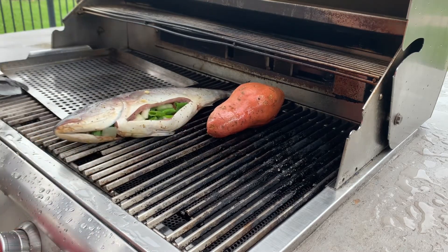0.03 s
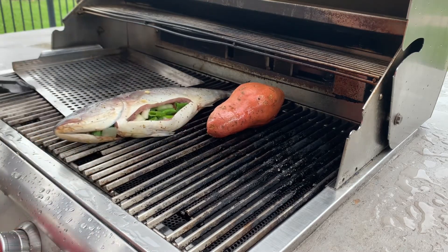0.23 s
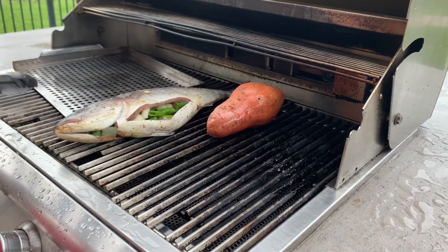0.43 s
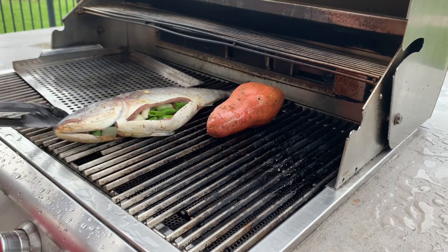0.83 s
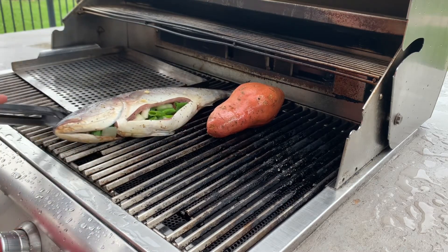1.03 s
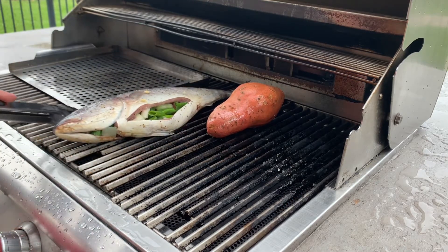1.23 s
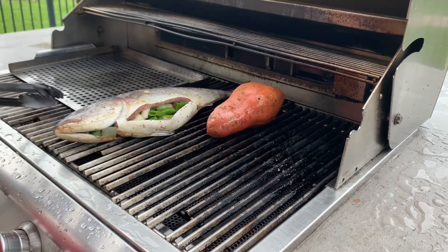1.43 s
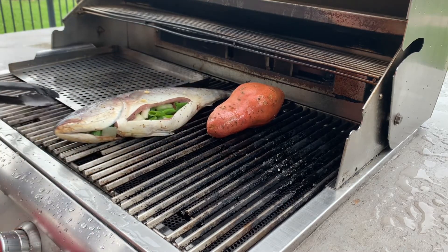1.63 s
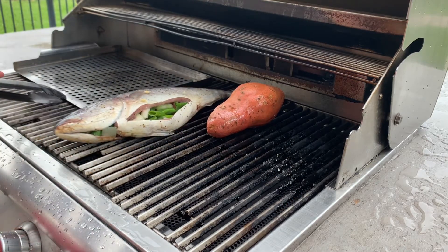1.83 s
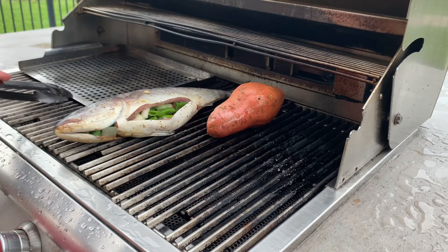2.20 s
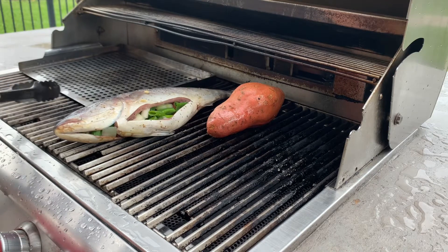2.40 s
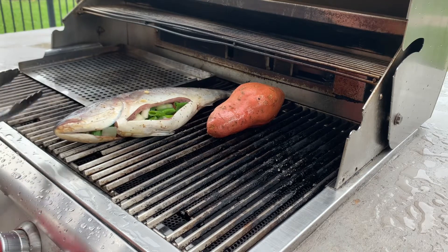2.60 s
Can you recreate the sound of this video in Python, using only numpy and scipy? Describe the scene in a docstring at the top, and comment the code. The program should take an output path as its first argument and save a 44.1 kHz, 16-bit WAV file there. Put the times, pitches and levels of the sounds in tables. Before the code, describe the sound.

Close by, metal tongs clank sharply on a grill tray, knock twice more, then finish with a longer ringing scrape. Fat sizzles faintly and a soft hiss comes and goes over a steady outdoor rumble.

```python
"""Over a steady rumble, outdoor air and a faint sizzle of fat, steel tongs scrape and clack
on a perforated tray lying on a gas barbecue. Stick-slip scrapes ring the tong arms; clacks ring
the tips and jaws. Both drive the thin tray, and the firebox answers low and a little late.
A soft high hiss swells about once a second."""
import sys
import numpy as np
from scipy import signal
from scipy.fft import rfft, irfft, next_fast_len
from scipy.io import wavfile

SR = 44100
rng = np.random.default_rng(int(sys.argv[2]) if len(sys.argv) > 2 else 0)


def int16_out(signal):
    """Quantize to a 16-bit WAV file."""
    q = np.round(np.clip(np.atleast_2d(signal).T, -1, 1) * 32767)
    wavfile.write(sys.argv[1], SR, q.astype(np.int16))


N = 121275


def undb(db):
    """Decibels to gain."""
    return 10 ** (np.asarray(db) / 20)


def unit(x):
    """Scale to a mean energy of one per channel."""
    return x / np.sqrt(np.sum(x ** 2) / len(np.atleast_2d(x)) + 1e-18)


def along(points, hz):
    """Read (Hz, value) points on a log-frequency axis."""
    p = np.array(points)
    return np.interp(np.log(hz + 1), np.log(p[:, 0]), p[:, 1])


def shape(x, gain):
    """Filter by a gain that is a function of frequency."""
    size = next_fast_len(2 * x.shape[-1])
    hz = np.arange(size // 2 + 1) * SR / size
    return irfft(rfft(x, size) * gain(hz), size)[..., :x.shape[-1]]


def colour(x, points):
    """Filter by a (Hz, dB) spectrum."""
    return shape(x, lambda f: undb(along(points, f)))


def brighten(x, db_per_octave):
    """Tilt the treble about 4 kHz."""
    return shape(x, lambda f: undb(db_per_octave * np.log2(np.clip(f, 1000, 14000) / 4000)))


def add(track, start_s, x):
    """Mix x into the track from a start time."""
    i = max(int(start_s * SR), 0)
    track[i:i + len(x)] += x[:N - i]


def radiate(force, response):
    """Sound of a body driven by a force."""
    return signal.fftconvolve(force[None], response, axes=1)[:, :N]


def clicks(size, per_s, scatter_db):
    """Random clicks of uneven strength."""
    when, sign, strength = rng.random((3, N))[:, :size]
    return (when < per_s / SR) * np.sign(sign - .5) * undb(-scatter_db * np.log(strength + 0.0018))


def modes(table, size=SR * 3 // 2):
    """Ring of (Hz, dB, t60 s) modes; each reaches the two ears in a different phase."""
    t = np.arange(size) / SR
    ear_rad = np.array([[.42], [-.42]])
    ring = 0
    for k, (hz, db, t60) in enumerate(table):
        phase = (-1) ** k * ear_rad * min(hz / 2000, 1)
        ring = ring + undb(db - 60 * t / t60) * np.sin(2 * np.pi * hz * t + phase)
    return unit(ring)


# Each row: frequency in Hz, relative spectral level in dB.
AIR_SPECTRUM = [(20, -36), (36, -12), (52, -1), (80, 0.06), (100, -8), (122, -6), (150, -13), (210, -13),
                (290, -16), (390, -24), (560, -21), (750, -25), (1100, -25), (1600, -35), (2600, -39),
                (5000, -46), (10000, -50), (15000, -68)]
# Each row: frequency in Hz, coherence between the ears from 0 to 1.
AIR_COHERENCE = [(50, 0.95), (250, 0.92), (1000, 0.06), (3000, 0.068), (10000, 0.19)]


def background():
    """A wavering rumble with a low hum, under the soft rush of outdoor air."""
    air_db, waver_db, hum_hz, hum_db = -27, 0.73, 81.6, -44.5
    t = np.arange(N) / SR
    mid = shape(rng.standard_normal(N), lambda f: np.sqrt(1 + along(AIR_COHERENCE, f)))
    side = shape(rng.standard_normal(N), lambda f: np.sqrt(1 - along(AIR_COHERENCE, f)))
    drift = lambda hz: np.sqrt(N) * unit(shape(rng.standard_normal(N), lambda f: np.exp(-(f / hz) ** 2)))
    air = np.sqrt(N) * unit(colour(np.array([mid + side, mid - side]), AIR_SPECTRUM))
    air *= undb(air_db - waver_db * drift(hz=5.1))
    hum = undb(hum_db) * np.sqrt(2) * np.sin(2 * np.pi * hum_hz * t + drift(hz=10.4))
    return air + hum


# Each row: frequency in Hz, gain in dB.
CRACK_SPECTRUM = [(1500, 0), (3500, 12), (7000, 10), (10500, 13), (14000, 1.5), (16000, -32)]


def crack(decay_s):
    """A short burst of bright noise, for spitting fat and steel contacts."""
    t = np.arange(SR // 10) / SR
    return unit(colour(rng.standard_normal((2, len(t))), CRACK_SPECTRUM) * np.exp(-t / decay_s))


# Each row: start in seconds, level in dB.
FAT_SPITS = [(0.742, -47), (1.308, -51), (1.335, -50), (1.356, -51), (1.516, -43.5), (1.916, -47),
             (2.008, -48), (2.112, -45)]
# Each row: start in seconds, decay in seconds, level in dB.
SIZZLE_FLARES = [(1.309, 0.029, -46.5), (1.514, 0.044, -46)]


def sizzle():
    """Fat crackles finely on the hot bars, with single spits and short flares."""
    steady_db, spit_s = -69, 0.0025
    t = np.arange(N) / SR
    spits = np.zeros(N)
    for start_s, db in FAT_SPITS:
        add(spits, start_s, undb([db]) * np.sqrt(SR * spit_s * 2))
    flares = sum(undb(db) * (t > start_s) * np.exp(-np.abs(t - start_s) / decay_s)
                 for start_s, decay_s, db in SIZZLE_FLARES)
    crackle = np.sqrt(N) * unit(clicks(N, per_s=1000, scatter_db=3))
    return radiate(spits + (undb(steady_db) + flares) * crackle, crack(spit_s))


# Each row: start in seconds, length in seconds, relative drive in dB, change over the stroke in dB,
# brightness in dB/octave, relative arm ring in dB, tilt of that ring in dB/octave.
STROKES = [(0.0, 0.069, -9, -10.5, -1.5, -10, -7), (0.073, 0.022, -13, -14, 4.5, 3, -16),
           (0.164, 0.091, -17.5, 2, 5.5, -3, -14), (0.255, 0.057, 3.5, -20, 0.5, 1.5, -8),
           (0.863, 0.085, -9.5, -1, 0.5, -11, 7), (0.971, 0.073, -17, 3.5, 4.5, 1.5, -12),
           (1.034, 0.05, -10.5, -2, 2.5, 1.5, -22), (1.178, 0.18, -29.5, -12, 7, -9, -5),
           (1.216, 0.057, -34, -15, 4, 12, -17), (1.623, 0.033, -13, 6, 1, -24, 6),
           (1.657, 0.026, -2.5, -16, 5, 0, -16), (2.206, 0.026, -19, 10.5, 8, 8, -9),
           (2.229, 0.17, -7, -3.5, 1.7, 4.5, 3.5), (2.401, 0.14, -18, -3.5, -4, 4, -7)]
# Each row: frequency in Hz, relative level in dB, t60 in seconds.
ARM_MODES = [(2115, -5, .16), (2190, -3, .14), (2290, -2, .09), (2350, 2, .16), (2430, -2, .12),
             (2535, 1, .22), (2590, -4, .3), (3171, 1, .18), (3255, -2, .12), (3410, 3, .13),
             (3480, 1, .11), (4118, -7, .14), (4715, -7, .14)]


def scrapes():
    """Stick-slip of tongs on the tray. Returns four drives and the arm ring, detuned by each grip."""
    plate, notes, cracks, box = np.zeros((4, N))
    arms = np.zeros((2, N))
    for start_s, length_s, db, change_db, brightness, arms_db, tilt in STROKES:
        size = int(length_s * SR)
        envelope = undb(db - 14 + change_db * np.arange(size) / size)
        slips = np.sqrt(size) * unit(clicks(size, per_s=900, scatter_db=1.5)) * envelope
        rub = brighten(slips, brightness)
        add(plate, start_s, rub)
        add(notes, start_s, undb(-21) * rub)
        add(cracks, start_s, undb(-16) * rub)
        add(box, start_s, undb(-8) * slips)
        grip = 1 + 0.002 * rng.standard_normal(len(ARM_MODES))
        held = [(hz * detune, mode_db + tilt * np.log2(hz / ARM_MODES[0][0]), t60)
                for (hz, mode_db, t60), detune in zip(ARM_MODES, grip)]
        for ear, ring in zip(arms, radiate(slips, modes(held, size=SR // 5))):
            add(ear, start_s, undb(arms_db - 5) * ring)
    return np.array([plate, notes, cracks, box]), arms


# Each row: frequency in Hz, t60 in seconds.
PLATE_DECAY = [(200, 1), (1200, 0.44), (2600, 0.5), (5000, 0.4), (9000, 0.33), (14000, 0.39)]


def wash(spectrum, gap_hz, spread_turns):
    """Ring of crowded plate modes about gap_hz apart; the lowest last longest."""
    t = np.arange(SR) / SR
    bins_hz = np.arange(SR // 2 + 1)
    offset, _, phase, ear = rng.random((3000, 4)).T
    hz = ((np.arange(len(offset)) + offset) * gap_hz).astype(int)
    keep = hz < SR // 2
    turns = phase + np.array([[.5], [-.5]]) * spread_turns * (ear - .5)
    lines = np.zeros((2, len(bins_hz)), complex)
    lines[:, hz[keep]] = (undb(along(spectrum, hz)) * np.exp(2j * np.pi * turns))[:, keep]
    ring = 0
    for band_hz, t60 in PLATE_DECAY:
        band = along([(f, float(f == band_hz)) for f, _ in PLATE_DECAY], bins_hz)
        ring = ring + irfft(lines * band, SR) * undb(-60 * t / t60)
    return unit(ring)


# Each row: frequency in Hz, relative level of the crowded modes in dB.
TRAY_SPECTRUM = [(300, -7.5), (1100, -7), (1500, 0), (1950, -5.5), (2380, 6), (2780, -3.5), (3400, -2),
                 (4200, -1), (5200, -6), (8000, -6), (10500, -11), (13500, -30.5), (16000, -61)]
# Each row: frequency in Hz, relative level in dB, t60 in seconds.
TRAY_MODES = [(2126, -8, .7), (2322, 0, .5), (2359, -2, .45), (2455, -8, .7), (2528, -3, .55),
              (2562, -13, 1.4), (2598, -4, .8), (2837, -6, 1.3), (2993, -4, .45), (3162, -8, .9),
              (3252, -4, .7), (3639, -7, .5), (4226, 1, .35), (4285, -3, .85), (4998, -10, .5),
              (5243, -10, .5), (5630, -3, .3), (5816, -7, .65), (5977, -5, .45), (6255, -12, .9),
              (6388, -11, .7), (6988, -5, .35), (7806, -8, .55), (8010, -7, .4)]


def tray(plate_drive, note_drive):
    """The thin tray rings with crowded modes and clear notes."""
    crowded = undb(-4.5) * wash(TRAY_SPECTRUM, gap_hz=16, spread_turns=1)
    return radiate(plate_drive, crowded) + radiate(note_drive, modes(TRAY_MODES))


# Each row: frequency in Hz, relative level of the crowded modes in dB.
FIREBOX_SPECTRUM = [(90, -7), (180, 5.5), (330, 0.5), (560, 5.5), (750, -2), (1500, -8.5), (3000, -68)]
# Each row: frequency in Hz, relative level in dB, t60 in seconds.
FIREBOX_MODES = [(180, 1, 0.51), (212, 1.5, 0.9), (237.7, 0.5, 0.37), (292.7, -5.5, 0.31),
                 (370.8, -1, 0.65), (450.5, 1.5, 0.57), (482.3, 5, 0.37), (543, -1, 0.53),
                 (581.8, -1, 0.77)]


def firebox(drive, rise_s=0.0089):
    """The firebox answers low; its ring takes a moment to build."""
    bloom = lambda ring: unit(ring * (1 - np.exp(-np.arange(ring.shape[1]) / SR / rise_s)))
    clear = undb(-5.5) * bloom(modes(FIREBOX_MODES))
    crowded = undb(-6) * bloom(wash(FIREBOX_SPECTRUM, gap_hz=10, spread_turns=0.043))
    return radiate(drive, clear) + radiate(drive, crowded)


# Each row: start in seconds, six relative drives in dB (tray plate, tips, jaws, crack, tray notes,
# firebox), brightness in dB/octave, chatter decay in seconds.
BLOWS = [(0.069, -34.5, -50, -48, -60, -48, -30.5, -6.5, 0.0028),
         (0.163, -28.5, -53, -51, -45, -34, -37.5, -2.5, 0.0023),
         (0.216, -14, -29, -27, -19, -43, -59, 1.5, 0.0026),
         (0.2207, -11, -21, -17.5, -18.5, -18.5, -18, 2.5, 0.0034),
         (0.243, -15, -24, -40, -24, -66, -29.5, 1.5, 0.11),
         (0.857, -30, -41, -34, -37.5, -33, -57, -2, 0.00068),
         (0.9253, -22, -29, -21, -25, -31, -24, -2.5, 0.0073),
         (0.9291, -27.5, -45, -18.5, -39, -47, -30, 5, 0.0099),
         (1.2107, -52, -54, -46, -50.5, -51.5, -43, -1, 0.0031),
         (1.599, -52, -37, -41, -39.5, -51, -65, -4, 0.0011),
         (1.650, -28.5, -43, -41, -34.5, -34.5, -29.5, 8, 0.0043),
         (1.690, -24.5, -29, -50, -26.5, -41, -26.5, 7, 0.0026),
         (2.212, -28.5, -48, -45, -52, -35, -30.5, 2, 0.0013),
         (2.2269, -16.5, -38, -38, -51, -31, -21.5, 2, 0.0068),
         (2.3153, -23.5, -48, -50, -52, -39, -25, 1.5, 0.0022)]


def clacks():
    """Tongs strike the tray and chatter. Returns the four drives, then those of tips and jaws."""
    plate, notes, cracks, box, tips, jaws = np.zeros((6, N))
    t = np.arange(SR // 10) / SR
    blow = np.sqrt(len(t)) * (t == 0)
    for start_s, plate_db, *drives_db, brightness, chatter_s in BLOWS:
        chatter = unit(clicks(len(t), per_s=5000, scatter_db=1) * np.exp(-t / chatter_s))
        contact = blow[0] * unit(unit(blow) + undb(11.5) * chatter)
        add(plate, start_s, undb(plate_db) * brighten(contact, brightness))
        for drive, db in zip((tips, jaws, cracks, notes, box), drives_db):
            add(drive, start_s, undb(db) * blow)
    return np.array([plate, notes, cracks, box]), tips, jaws


# Each row of both: frequency in Hz, relative level in dB, t60 in seconds.
TIP_MODES = [(1440, -14, .09), (4250, 2, .14), (4370, 2, .1), (5060, -10, .03), (5450, -6, .06),
             (5710, -2, .05), (6790, -3, .09), (7170, -4, .04), (10230, -3, .05), (10470, -5, .07)]
JAW_MODES = [(3650, -13, 0.0048), (3675, -5.5, 0.023), (3770, -6, 0.012)]


def tongs(contact_rise_s=0.0003):
    """Clacks ping the tips and knock the jaws; clacks and scrapes crack and ring tray and firebox."""
    clack_drives, tips, jaws = clacks()
    scrape_drives, arms = scrapes()
    plate, notes, cracks, box = clack_drives + scrape_drives
    t = np.arange(SR // 10) / SR
    press = 1 - np.exp(-t / contact_rise_s)
    pings = radiate(tips, modes(TIP_MODES, len(t)) * press)
    knocks = radiate(jaws, modes(JAW_MODES, len(t)) * press)
    tray_ring = tray(plate, notes)
    contact_noise = radiate(cracks, unit(crack(decay_s=0.016) * press))
    return arms + pings + knocks + tray_ring + contact_noise + firebox(box)


# Each row: centre in seconds, half width in seconds, level in dB.
HISS_SWELLS = [(0.595, 0.068, -43), (1.555, 0.068, -48), (2.585, 0.054, -44.5)]
# Each row: frequency in Hz, relative spectral level in dB.
HISS_SPECTRUM = [(3000, 6), (6000, 2), (9500, 5.5), (12000, -5), (15500, 1)]


def hiss():
    """A soft high hiss swells and fades about once a second."""
    t = np.arange(N) / SR
    level = sum(undb(db) * np.exp(-((t - centre_s) / width_s) ** 2)
                for centre_s, width_s, db in HISS_SWELLS)
    return level * np.sqrt(N) * unit(colour(rng.standard_normal((2, N)), HISS_SPECTRUM))


# Each row: frequency in Hz, left minus right in dB.
EAR_BALANCE = [(70, -1.5), (200, -1), (700, 0.9), (2400, 0), (4400, -1), (8000, -3), (14000, 1.5)]


def scene():
    """All sources together; the ears differ in colour and the right one hears a little late."""
    lag_s = 0.0001
    left, right = background() + tongs() + sizzle() + hiss()
    left_gain = lambda f: undb(along(EAR_BALANCE, f) / 2)
    right_gain = lambda f: np.exp(-2j * np.pi * f * lag_s) / left_gain(f)
    return np.array([shape(left, left_gain), shape(right, right_gain)])


def record(dry):
    """Hard-limit at full scale, then low-pass at 15.6 kHz."""
    lowpass = signal.ellip(8, .2, 70, 15600, fs=SR, output="sos")
    return signal.sosfilt(lowpass, np.clip(dry, -1, 1))


dry = scene()
out = record(dry)
int16_out(out)
```